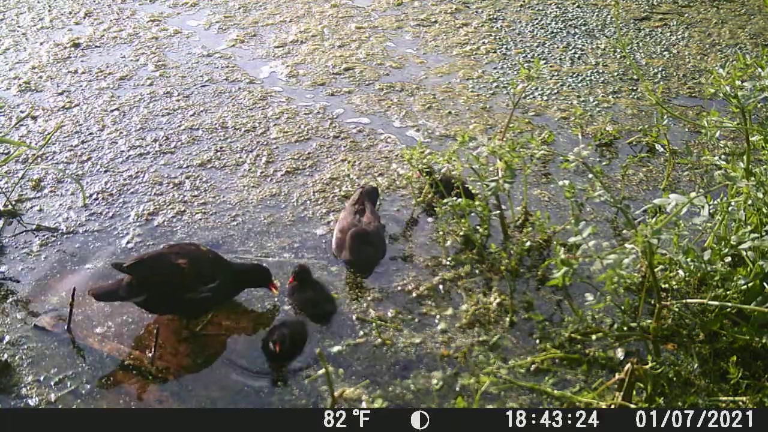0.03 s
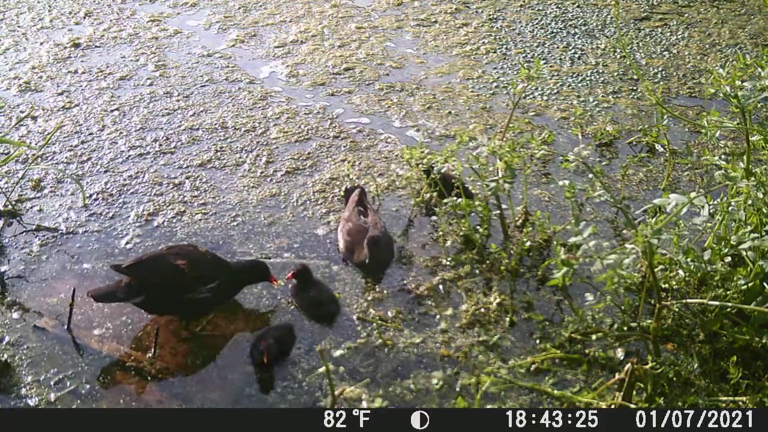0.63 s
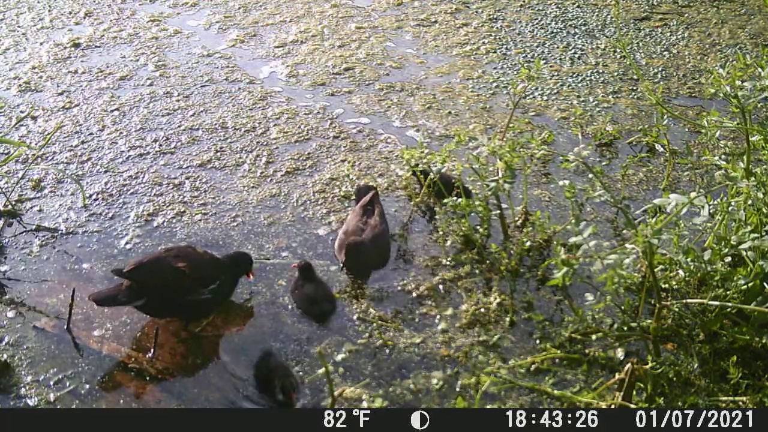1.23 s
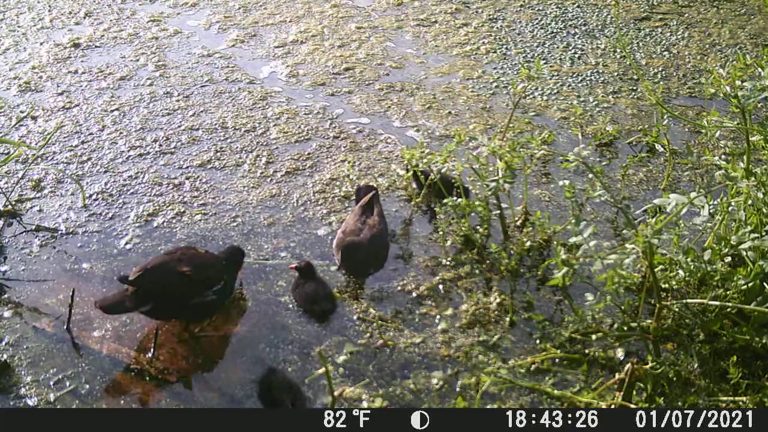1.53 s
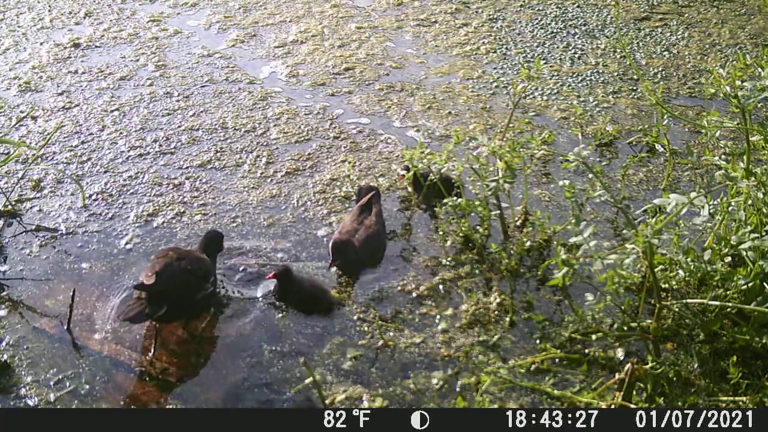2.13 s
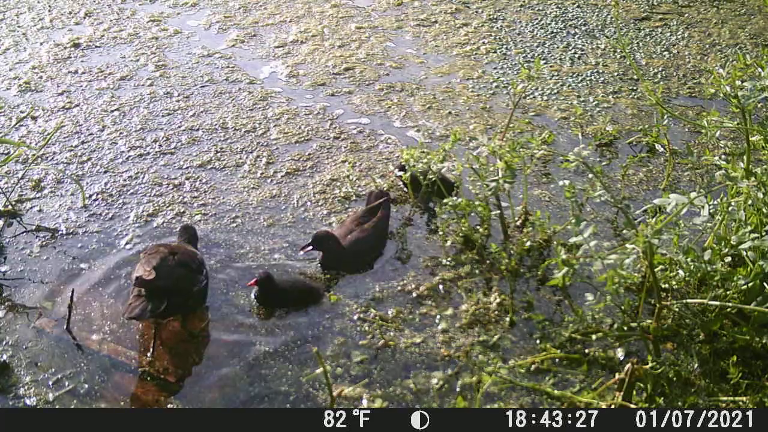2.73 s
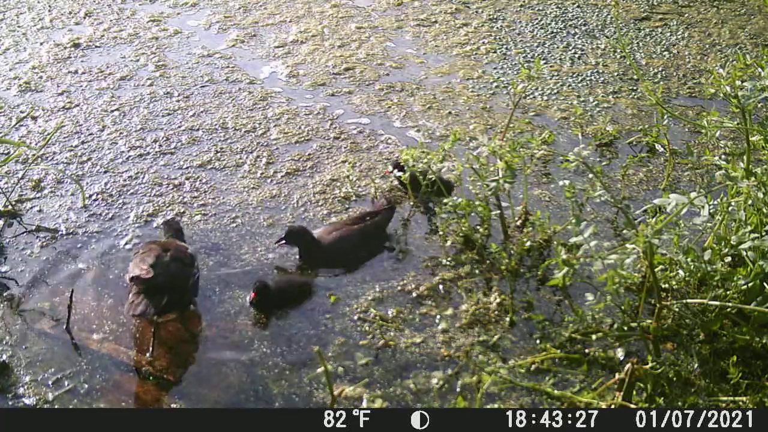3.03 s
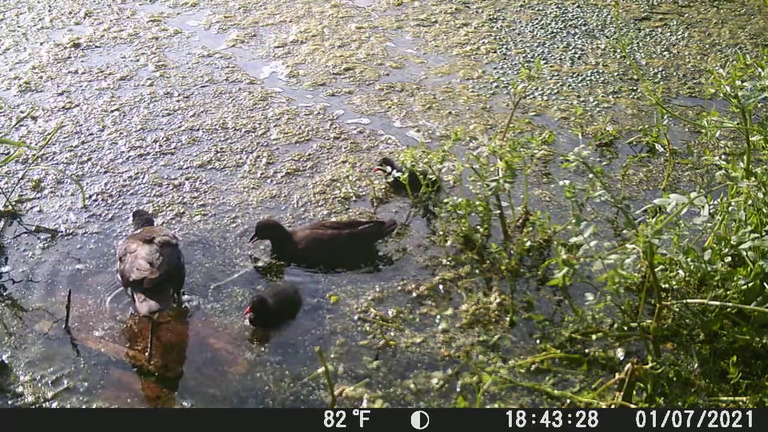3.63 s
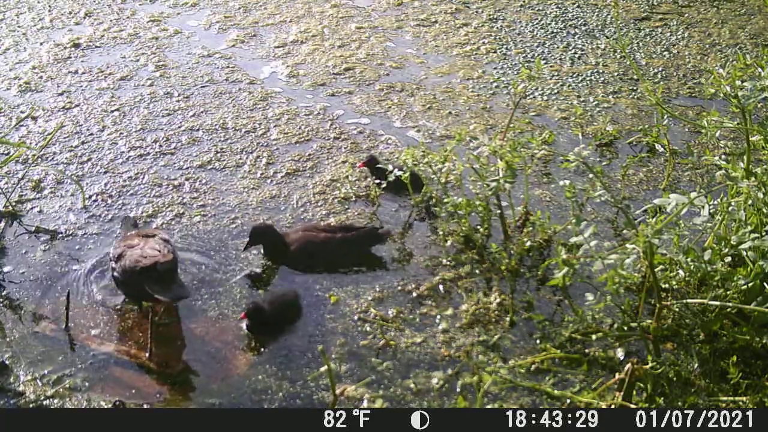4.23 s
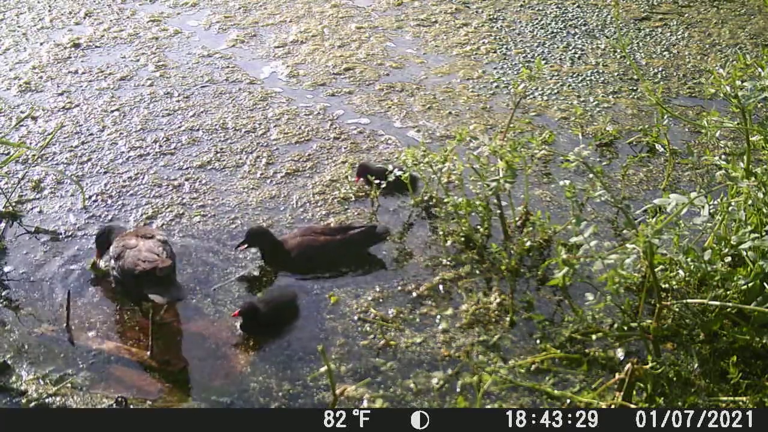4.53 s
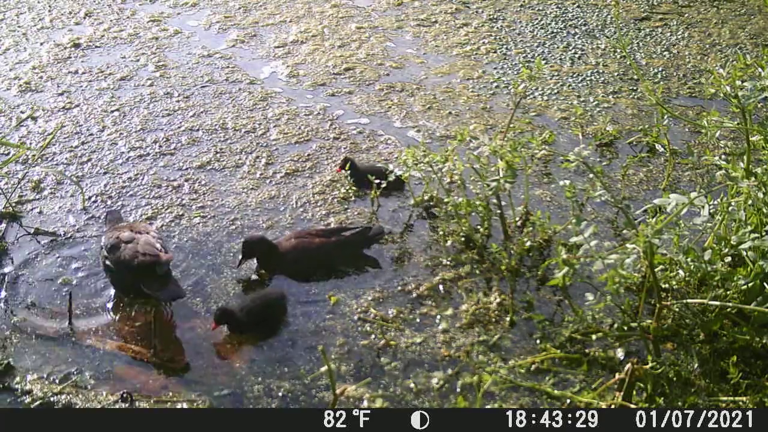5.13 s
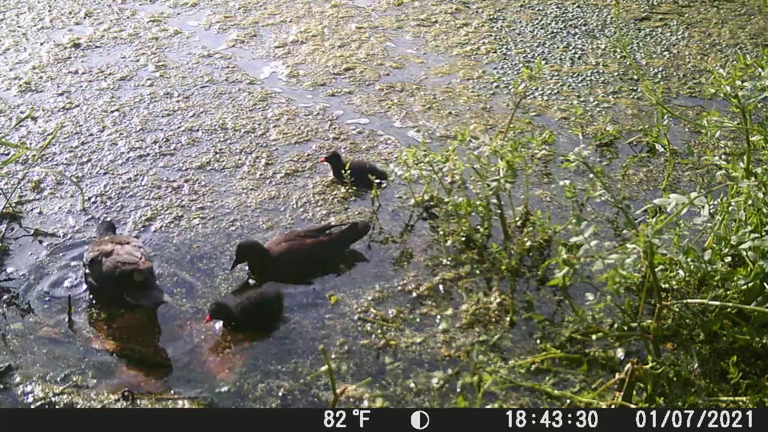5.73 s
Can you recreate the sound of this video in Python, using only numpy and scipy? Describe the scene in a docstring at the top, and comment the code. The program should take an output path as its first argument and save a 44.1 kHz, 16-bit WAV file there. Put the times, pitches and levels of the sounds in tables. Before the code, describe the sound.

On a weedy pond, moorhen chicks peep faintly throughout in thin, high whistles, often in pairs. The adults add a few soft, short, husky notes, mostly in the second half. A much louder low rumble of far traffic runs underneath, with an engine hum that swells early and fades. The outdoor camera's microphone adds a slightly hollow hiss and tiny, fizzy ticks.

```python
"""Moorhen chicks on a trail camera

Chicks peep faintly on a weedy pond in thin, arching whistles, while the feeding adults give a few
soft, husky notes. Far traffic rumbles and an engine hums. The camera's housing colours the birds
and the air; its electronics tick about five times a second, each tick trailing a spell of fizz."""
import sys
import numpy as np
from scipy import signal
from scipy.fft import rfft, irfft
from scipy.io import wavfile
from scipy.ndimage import uniform_filter1d

SR = 44100
rng = np.random.default_rng(int(sys.argv[2]) if len(sys.argv) > 2 else 0)


def dump_mix(stems):
    """Bounce the given channels to the path in sys.argv[1] as a 16-bit WAV at rate SR."""
    frames = np.atleast_2d(stems).T  # one column per channel
    limited = np.clip(frames, -1, 1)  # hard clip at full scale
    pcm = np.round(limited * 32767).astype(np.int16)
    wavfile.write(sys.argv[1], SR, pcm)


N = 254898
TIME = np.arange(N) / SR
BIN_HZ = np.maximum(np.arange(N // 2 + 1) * SR / N, 1)


def chick_peeps(foot_hz=4830, plain_top_hz=6200, waver=0.0059, flutter_db=3.2, trim_db=0.1):
    """Near-pure whistles that rise, crest and fall; higher ones fall longer and press harder."""
    # one arch of pitch per peep: crest_s, top_hz, rise_s, level_db
    peeps = [(.129, 6420, .026, -82), (.233, 6960, .025, -85), (.486, 6600, .020, -87),
             (.584, 6900, .025, -84), (.796, 6220, .025, -78.5), (.923, 6780, .025, -78),
             (1.189, 6000, .025, -84.5), (1.298, 6550, .026, -80.5), (1.557, 6240, .024, -82),
             (1.691, 6360, .030, -80.5), (2.011, 6160, .030, -80), (2.117, 7380, .030, -79.5),
             (2.353, 6660, .030, -80), (2.488, 6420, .025, -81), (2.978, 6360, .046, -81),
             (3.267, 6120, .042, -78.5), (3.368, 6660, .035, -79), (3.599, 6780, .035, -77.5),
             (3.714, 6660, .025, -82), (4.034, 5940, .045, -84), (4.149, 6360, .030, -82),
             (4.376, 6360, .040, -82), (4.492, 6300, .025, -82), (4.800, 6020, .045, -82),
             (4.924, 6240, .035, -79), (5.200, 6180, .048, -79.5), (5.327, 6240, .030, -77.5),
             (5.702, 5740, .044, -81)]
    # contour of a peep: place (-1 start, 0 crest, 1 end), pitch_height (0 foot, 1 top), effort_db
    contour = [(-1.2, 0, -30), (-1, .08, -9), (-.6, .58, -5.5), (-.3, .89, -2), (0, 1, 1), (.3, .88, 0),
               (.6, .48, -3), (.9, .1, -2.5), (1.1, -.04, -7), (1.35, -.06, -30)]
    places, heights, efforts = np.transpose(contour)
    out = np.zeros(N)
    wobble, flutter = 1 + waver * drift(200), flutter_db * drift(120)
    for crest_s, top_hz, rise_s, level_db in peeps:
        octaves_up = np.log2(top_hz / plain_top_hz)
        fall_s, accent_db = .0275 + .025 * octaves_up, 30 * octaves_up
        place = (TIME - crest_s) / np.where(TIME < crest_s, rise_s, fall_s)
        on = (place > places[0]) & (place < places[-1])
        height = uniform_filter1d(np.interp(place[on], places, heights), size=260)   # rounds the bends
        pitch_hz = foot_hz + (top_hz - foot_hz) * height / height.max()
        effort_db = np.interp(place[on], places, efforts) + accent_db * np.clip(2 * place[on], 0, 1)
        out[on] += from_db(level_db + trim_db + effort_db + flutter[on]) * tone(pitch_hz * wobble[on])
    return out


def adult_notes(glide=0.03, rasp=.022, whistle_db=1.2, husk_db=-7.0):
    """Short, slightly hoarse notes that bend upward, each inside a longer puff of husky noise."""
    # the older birds' calls: middle_s, pitch_hz, length_s, level_db
    notes = [(.51, 2790, .03, -80), (0.62, 1910, 0.028, -69.5), (1.636, 2750, 0.032, -73),
             (2.683, 2250, 0.028, -74), (3.247, 1900, 0.025, -68), (3.491, 1940, .018, -70),
             (3.495, 2780, .016, -75), (3.515, 2800, 0.028, -68), (3.682, 2076, 0.023, -69.5),
             (3.697, 2720, .026, -69), (4.144, 2070, 0.02, -72), (4.323, 2740, 0.022, -75.5),
             (4.484, 1900, 0.011, -74.5), (4.61, 2820, .022, -76.5)]
    # spectrum of the husk: frequency_hz, gain_db
    husk_eq = [(1400, -20), (1900, 2), (2900, -6.5), (3600, -16), (5000, -27)]
    out = np.zeros(N)
    hoarseness = 1 + rasp * drift(300)
    husk = noise(eq_curve(husk_eq))
    for middle_s, pitch_hz, length_s, level_db in notes:
        on = np.abs(TIME - middle_s) < length_s
        place = (TIME[on] - middle_s) / length_s
        swell = np.maximum(np.cos(np.pi * place), 0)
        whistle = swell * tone(pitch_hz * (1 + glide * place) * hoarseness[on])
        puff = np.cos(np.pi * place / 2) * husk[on]
        out[on] += from_db(level_db + whistle_db) * whistle + from_db(level_db + husk_db) * puff
    return out


def traffic(low_hz=52.62, upper_hz=74.26, wander_hz=1.197, throb_db=1.0):
    """Far traffic: two unsteady exhaust drones over deep rumble and road roar."""
    # spectra of the rumble and the roar: frequency_hz, gain_db
    rumble_eq = [(8, -13.5), (18, 0.5), (26, -10), (36, -10), (46, -15.5), (70, -19.5), (100, -38),
                 (160, -62)]
    roar_eq = [(55, -13), (85, 3), (100, -3), (115, -6.5), (135, -11), (165, -29.5), (250, -43)]
    # fader moves for the rumble, the roar and each drone: time_s, level_db
    rumble_fader = [(0.0, -36.3), (1.36, -40.9), (1.52, -33.2), (1.76, -37.6), (1.92, -33.6), (2.28, -37.4),
                    (2.52, -28.0), (2.88, -38.8), (3.24, -32.1), (3.8, -37.7), (3.88, -33.4), (4.44, -38.5),
                    (4.68, -27.4), (4.8, -27.2), (4.96, -37.0), (5.78, -34.1)]
    roar_fader = [(0, -54.5), (1.0, -55), (1.8, -56.5), (2.1, -61), (2.6, -60), (3.0, -57.5), (3.9, -54.5),
                  (4.7, -57.5), (5.78, -55)]
    low_fader = [(0.0, -44.1), (0.8, -42.9), (0.92, -35.1), (1.2, -44.6), (2.04, -37.6), (2.12, -41.1),
                 (2.36, -33.0), (2.52, -41.9), (3.0, -44.4), (3.16, -33.3), (3.4, -45.8), (3.72, -41.5),
                 (4.0, -32.7), (4.16, -42.9), (4.84, -33.5), (5.28, -34.2), (5.36, -42.0), (5.78, -45.0)]
    upper_fader = [(0.0, -43.0), (0.76, -43.4), (1.24, -70.4), (1.36, -46.7), (1.4, -45.0), (1.52, -59.8),
                   (2.84, -57.8), (2.88, -51.0), (3.64, -39.8), (4.64, -42.7), (4.72, -51.9), (5.44, -47.5),
                   (5.6, -36.3), (5.78, -54.0)]
    bass = BIN_HZ < 400
    out = from_db(automation(rumble_fader)[0] + 0.8) * noise(eq_curve(rumble_eq) * bass)
    out += from_db(automation(roar_fader)[0]) * noise(eq_curve(roar_eq) * bass)
    for pitch_hz, fader, trim_db in ((low_hz, low_fader, 0.3), (upper_hz, upper_fader, 0)):
        level_db = automation(fader)[0] + trim_db + throb_db * drift(9.8)
        out += from_db(level_db) * tone(pitch_hz + wander_hz * drift(6.47))
    return out


def engine(throb_db=0.3):
    """A distant engine: one clean hum that sags, climbs and fades away."""
    # the engine's course: time_s, firing_hz, level_db
    course = [(0, 144, -71), (.25, 139, -58.5), (.6, 139, -55.5), (1.0, 135, -59.5), (1.42, 139.5, -53),
              (1.7, 140, -56.5), (1.95, 143, -66.5), (2.5, 146, -72), (3.7, 155, -74), (4.2, 150, -83.5),
              (5.78, 142, -74.5)]
    firing_hz, level_db = automation(course)
    return from_db(level_db - throb_db * drift(14)) * tone(firing_hz)


def far_hums(wander_hz=2.5):
    """Wavering low hums that swell out of the traffic and sink back."""
    # one swell per hum: middle_s, pitch_hz, length_s, level_db
    hums = [(.55, 97.9, 0.73, -58.5), (1.35, 92.8, 0.28, -52), (1.42, 151, .14, -61),
            (1.72, 92.8, .35, -49.5), (2.66, 124.2, .36, -55), (3.15, 139.3, 0.36, -63.5),
            (4.65, 228, .8, -71.5), (4.97, 139, .3, -69)]
    out, wander = np.zeros(N), wander_hz * drift(12)
    for middle_s, pitch_hz, length_s, level_db in hums:
        on = np.abs(TIME - middle_s) < length_s / 2
        swell = np.cos(np.pi * (TIME[on] - middle_s) / length_s)
        out[on] += from_db(level_db) * swell * tone(pitch_hz + wander[on])
    return out


def tick_times(count=8, gap_s=.2, hurry_s=.0044):
    """Each run of ticks keeps an even beat, then hurries a little through its second half."""
    # first tick of each run: start_s
    runs = [-.103, 1.47, 3.07, 4.67]
    beat = np.arange(count)
    offsets_s = gap_s * beat - hurry_s * np.maximum(beat + 1 - count / 2, 0)
    return np.add.outer(runs, offsets_s).ravel()


def camera_ticks(pitch_hz=6550, width_s=.0007, level_db=-64.8, spread_db=1.5):
    """The electronics tick in blips of a few treble cycles."""
    out = np.zeros(N)
    for tick_s in tick_times():
        on = np.abs(TIME - tick_s) < 4 * width_s
        age_s = TIME[on] - tick_s
        blip = np.exp(-(age_s / width_s) ** 2) * np.cos(2 * np.pi * pitch_hz * age_s)
        out[on] += from_db(level_db + spread_db * rng.standard_normal()) * blip
    return out


def camera_fizz(spell_s=.072, idle_db=-82, grain_db=3.0, trim_db=-3.5):
    """Grainy electronic hiss that gates on at each tick and off soon after."""
    # bouts of louder fizz: start_s, end_s, level_db
    bouts = [(0, .6, -73.5), (2.0, 2.75, -73.5), (4.35, 5.78, -72.5)]
    # spectrum of the fizz: frequency_hz, gain_db
    fizz_eq = [(1500, -9.5), (2800, 9), (4500, -9), (6300, 2.5), (7800, 3), (8500, -10.5), (10000, -33.5)]
    gate = np.zeros(N)
    for tick_s in tick_times():
        level_db = max([idle_db] + [db for start_s, end_s, db in bouts if start_s < tick_s < end_s])
        gate += from_db(level_db + trim_db) * ((TIME > tick_s) & (TIME < tick_s + spell_s))
    grainy_hiss = noise(eq_curve(fizz_eq)) * from_db(grain_db * drift(330))
    return uniform_filter1d(gate, size=300) * unit_rms(grainy_hiss)


def air(trim_db=2.0):
    """A steady bed of open air and microphone hiss, heard through the housing."""
    # spectrum of the bed: frequency_hz, gain_db
    air_eq = [(100, -6), (180, -3.5), (240, 1.5), (330, -3.5), (460, -8), (560, -14.5), (780, -12.5),
              (1050, -3), (1350, -8), (1650, -14), (2400, -17), (4700, -29), (6700, -26.5), (7600, -25),
              (8200, -33)]
    # fader moves for the bed: time_s, level_db
    air_fader = [(0, -63.5), (1.1, -62.5), (4.2, -63), (5.0, -63.5), (5.78, -64)]
    bed = unit_rms(housing(noise(eq_curve(air_eq))))
    return from_db(automation(air_fader)[0] + trim_db) * bed


def housing(sound):
    """The camera case rings at a few pitches and its microphone port cancels one."""
    # peaks and dips of the case: centre_hz, width_hz, gain_db
    rings = [(1014.4, 65, 7.5), (1090, 24, 4.5), (1129, 21, -2), (1165, 32, 7), (1222, 26, -3.5),
             (1256, 50, 9.5), (1323, 36, -1.5), (1345, 61, 9), (1458, 59, 3), (1520, 30, 3.5),
             (1950, 70, 0.5), (2400, 50, 0.5), (2740, 100, 1.5), (6310, 150, 4.5)]
    # cancellation at the port: centre_hz, width_hz, depth (0-1)
    port_notch = (646, 55, 0.85)
    notch_hz, notch_width_hz, depth = port_notch
    case_db = sum(gain_db * resonance(hz, width_hz) for hz, width_hz, gain_db in rings)
    port_gain = 1 - depth * resonance(notch_hz, notch_width_hz)
    return irfft(rfft(sound) * from_db(case_db) * port_gain, N)


def from_db(db):
    """Decibels to gain."""
    return 10 ** (np.asarray(db) / 20)


def unit_rms(sound):
    """Scale to unit rms."""
    return sound / np.sqrt(np.mean(sound ** 2) + 1e-20)


def automation(rows):
    """One curve at audio rate for each column after the time."""
    times_s, *columns = np.transpose(rows)
    return [np.interp(TIME, times_s, column) for column in columns]


def eq_curve(points):
    """Gain at every frequency, drawn through a few EQ points."""
    hz, db = np.transpose(points)
    return from_db(np.interp(np.log(BIN_HZ), np.log(hz), db))


def resonance(centre_hz, width_hz):
    """Power response of one resonance, 1 at its peak."""
    return 1 / (1 + (2 * (BIN_HZ - centre_hz) / width_hz) ** 2)


def noise(spectrum):
    """Unit-rms noise shaped by a gain at every frequency."""
    return unit_rms(irfft(rfft(rng.standard_normal(N)) * spectrum, N))


def drift(rate_hz):
    """Smooth random modulation of unit rms, rolling off above the given rate."""
    return noise(1 / (1 + (BIN_HZ / rate_hz) ** 4))


def tone(pitch_hz):
    """A unit-rms sine that follows a pitch curve."""
    return np.sqrt(2) * np.sin(2 * np.pi * (np.cumsum(pitch_hz) / SR + rng.random()))


def scene():
    """Birds, far traffic, air and camera noise in one mono mix."""
    birds = housing(chick_peeps() + adult_notes())
    return (birds + traffic() + engine() + far_hums() + air() + camera_ticks() + camera_fizz())[None]


def record(dry):
    """The camera cuts off the top treble with a steep low-pass."""
    cutoff_hz = 8450
    return signal.sosfiltfilt(signal.butter(16, cutoff_hz, fs=SR, output="sos"), dry, padlen=2000)


dry = scene()
out = record(dry)
dump_mix(out)
```